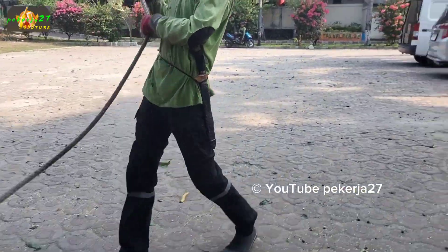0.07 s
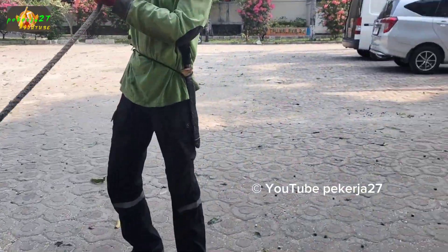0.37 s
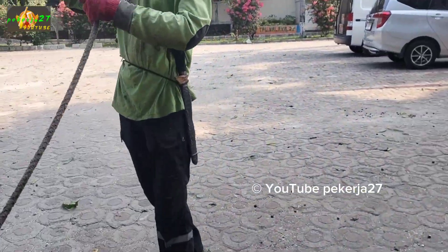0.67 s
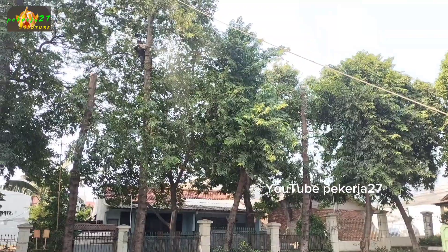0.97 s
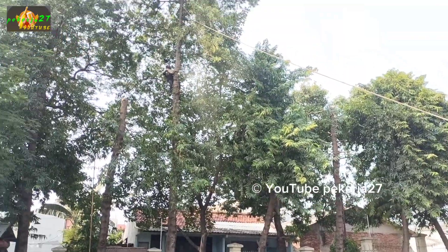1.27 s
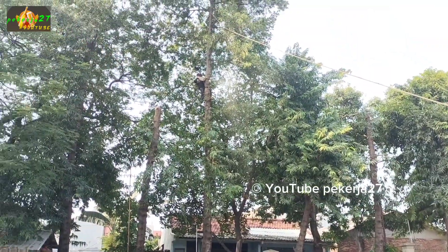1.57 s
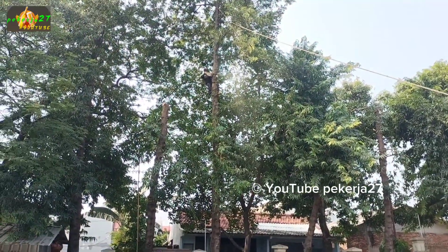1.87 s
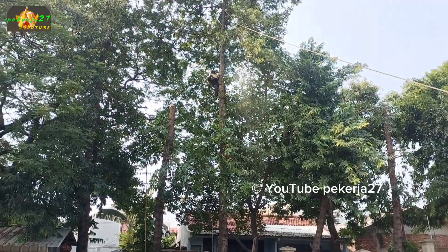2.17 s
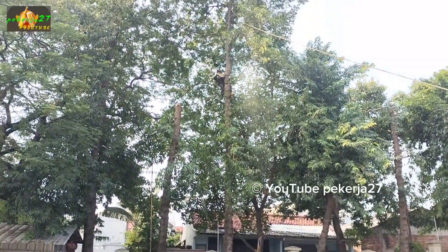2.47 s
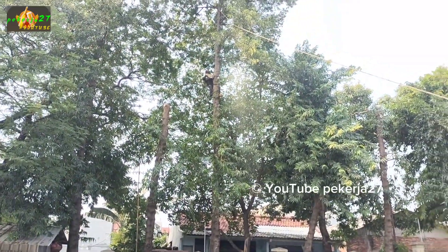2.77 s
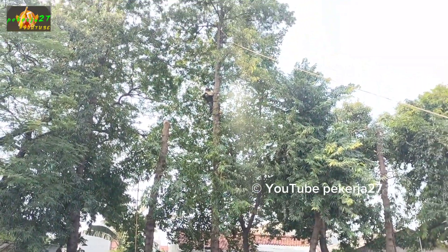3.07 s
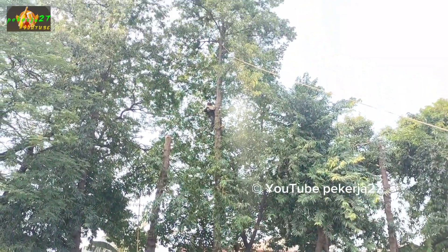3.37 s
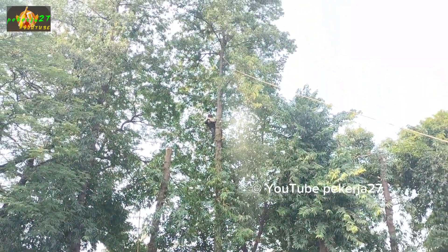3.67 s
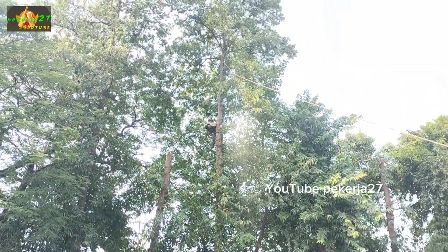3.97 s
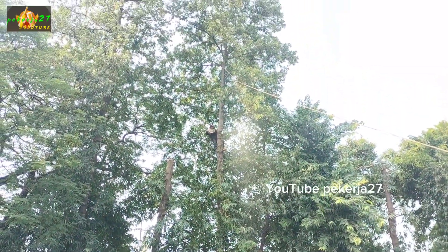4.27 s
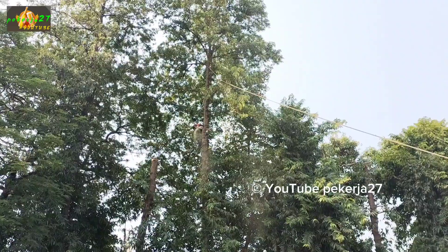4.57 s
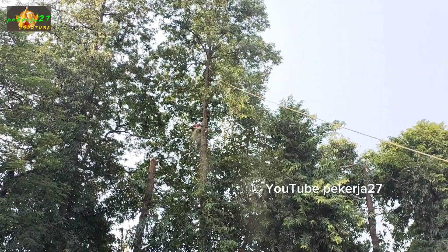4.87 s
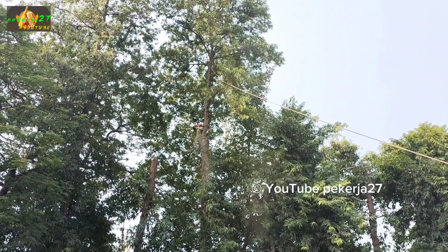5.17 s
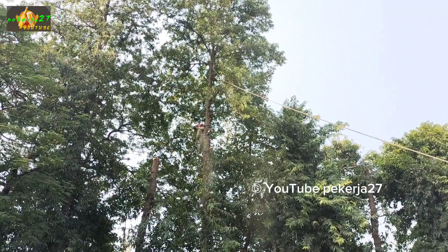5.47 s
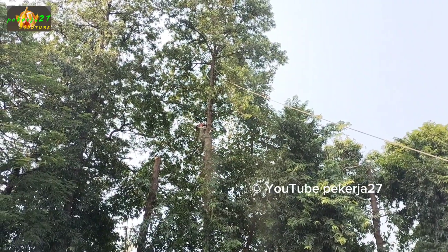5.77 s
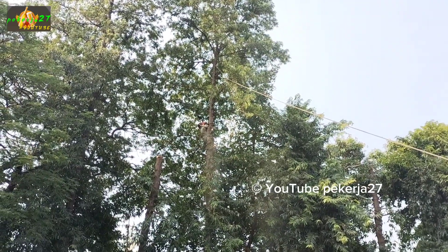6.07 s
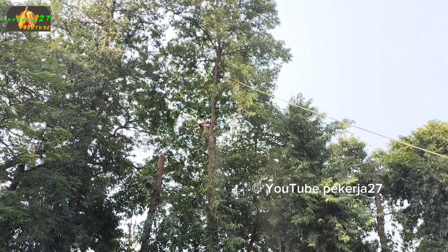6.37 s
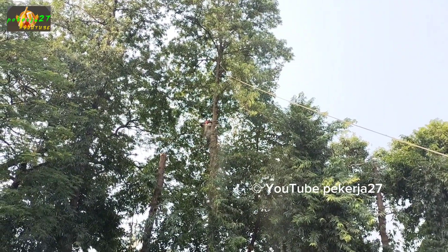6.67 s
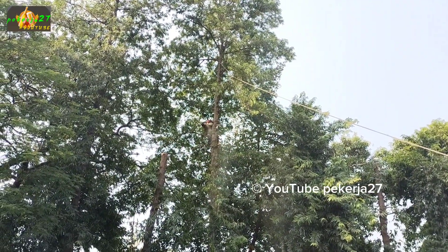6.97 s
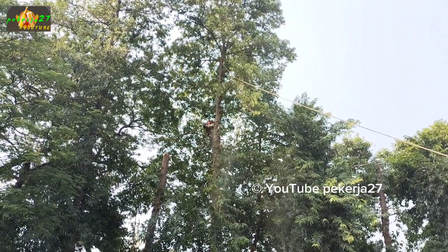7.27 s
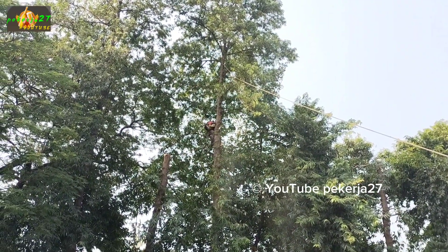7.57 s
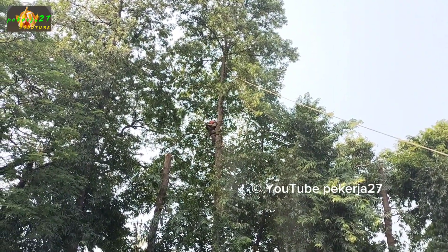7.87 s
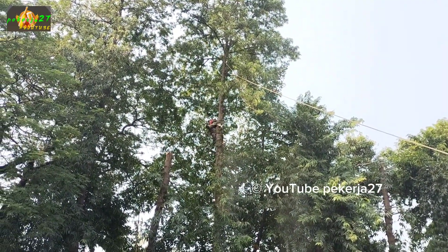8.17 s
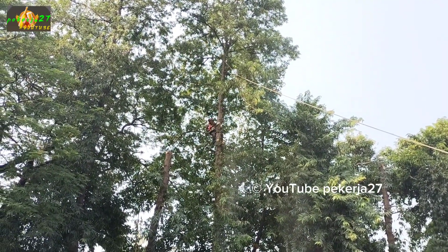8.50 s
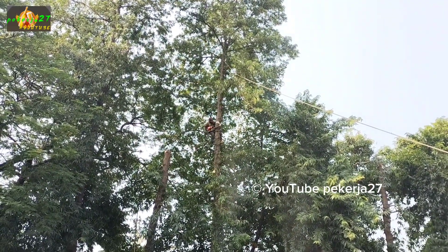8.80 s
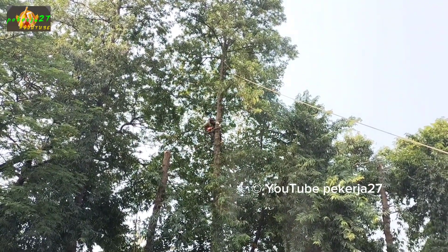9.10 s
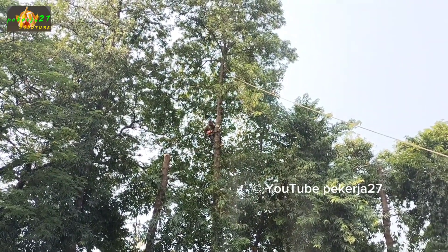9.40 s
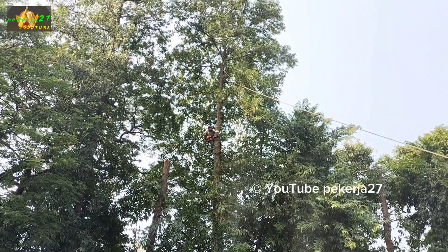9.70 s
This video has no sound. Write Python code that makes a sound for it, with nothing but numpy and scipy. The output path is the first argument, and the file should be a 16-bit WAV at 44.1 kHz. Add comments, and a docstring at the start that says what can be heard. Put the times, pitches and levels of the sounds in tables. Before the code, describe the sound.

It opens on quiet outdoor air with a faint hiss and a few soft scuffing steps, cutting to silence at about 0.8 seconds. At 1.3 seconds a two-stroke chainsaw up in a tree comes in abruptly, cutting wood at full throttle: a raspy, ringing buzz with a hissing chain and slightly wavering pitch. Near 3.9 seconds the throttle closes and the pitch falls, until a second silence from 4.4 to 5 seconds. The sound returns with a low puff of wind as the saw revs freely twice, briefly from 5 to 5.6 seconds, then longer and rougher from 5.7 to 6.7. It winds down and by about 7.5 seconds settles into a quieter, puttering idle, with irregular exhaust pops, casing rattle and small chain clinks until the end at 10 seconds. The stereo microphone hears it from the yard, over a soft low rumble.

```python
"""A quiet yard, with a low rumble and a few scuffs; then a two-stroke chainsaw high in a tree.
It cuts at full throttle, coasts, is blipped twice and sinks to a popping idle. Each crank turn
fires the exhaust, rings the muffler and shakes casing and clutch, while the chain hisses.
Over-revving without load, every other firing weakens. The stereo microphone hears the yard
in three stretches with silence between them."""
import sys
import numpy as np
from scipy import signal
from scipy.fft import rfft, irfft, next_fast_len
from scipy.io import wavfile
from scipy.ndimage import uniform_filter1d, map_coordinates

SR = 44100
rng = np.random.default_rng(int(sys.argv[2]) if len(sys.argv) > 2 else 0)


def wrap_up_sound(samples):
    """Save the sound to the file named by the first command line argument, as 16-bit audio."""
    columns = np.atleast_2d(samples).T
    # keep every value between -1 and 1, then stretch to whole-number steps
    tamed = np.clip(columns, -1, 1)
    steps = np.round(tamed * 32767).astype(np.int16)
    wavfile.write(sys.argv[1], SR, steps)


N = 433944
T = np.arange(N) / SR

# the stretches that are heard, with silence between them: (start [s], end [s])
STRETCHES = [(0, .824), (1.348, 4.444), (4.967, 10)]
# the exhaust's colour at idle: (frequency [Hz], gain [dB])
IDLE_SPECTRUM = [(60, -40), (130, -8), (250, -14), (400, 2), (520, -2.5), (690, 3.5), (830, -12.5),
                 (1200, -23), (2300, -5.5), (4000, -10), (6000, -34), (15000, -52)]
UNLOADED = T > STRETCHES[1][1]  # the chain is out of the wood


def amp(db):
    """Decibels to gain."""
    return 10 ** (np.asarray(db) / 20)


def unit(x):
    """Scale to rms 1."""
    return x / np.sqrt(np.mean(x ** 2) + 1e-20)


def steady(x):
    """Hold the short-term rms at 1."""
    return x / np.sqrt(np.abs(uniform_filter1d(x ** 2, size=4000)) + 1e-12)


def along(points, hz):
    """Read (frequency [Hz], value) points on a log axis."""
    f, v = np.transpose(points)
    return np.interp(np.log(hz + 1), np.log(f + 1), v)


def curve(points):
    """(time [s], value) points to one value per sample."""
    return np.interp(T, *np.transpose(points))


def wobble(rate, step=16):
    """A smooth random curve, rate knots a second."""
    at = np.arange(0, N + step, step)
    coarse = map_coordinates(rng.standard_normal(int(N * rate / SR) + 4), [at * rate / SR])
    return np.interp(np.arange(N), at, coarse)


def filtered(x, response):
    """x times a complex response of frequency."""
    size = next_fast_len(N + SR // 2)
    return irfft(rfft(x, size) * response(np.fft.rfftfreq(size, 1 / SR)), size)[..., :N]


def coloured(x, spectrum, size=4096):
    """Minimum-phase filter through (frequency [Hz], gain [dB]) points."""
    cepstrum = irfft(np.log(amp(along(spectrum, np.fft.rfftfreq(size, 1 / SR)))))
    cepstrum[1:size // 2] *= 2
    cepstrum[size // 2 + 1:] = 0
    impulse = irfft(np.exp(rfft(cepstrum)))
    return signal.oaconvolve(np.atleast_2d(x), impulse[None], axes=1)[:, :N]


def resonate(x, modes):
    """x through parallel resonances of alternating sign."""
    return filtered(x, lambda f: sum(
        (-1) ** k * amp(db) * 1j * f * width / (hz * hz - f * f + 1j * f * width)
        for k, (hz, width, db) in enumerate(modes)))


def reflected(x, decay_s=0.044):
    """x as mid, and its scattered near reflections as side."""
    t = T[:SR // 20]
    scatter = rng.standard_normal(len(t)) * amp(-60 * t / decay_s)
    phase = np.angle(rfft(scatter, 2 * len(t)))
    whitened = irfft(np.exp(1j * phase))[:len(t)]
    return np.array([x, signal.oaconvolve(x, whitened)[:N]])


def strokes(turns, strength, scatter_db, jitter_ms):
    """One pulse per turn, placed between samples, each a little different in size and timing."""
    count = np.arange(1, int(turns[-1]))
    late, loud = rng.standard_normal((2000, 2))[count].T
    at = np.interp(count, turns, np.arange(N))
    at = np.clip(at + late * jitter_ms[at.astype(int)] * SR / 1000, 8, N - 10)
    taps = at.astype(int)[:, None] + np.arange(-7, 9)
    offset = taps - at[:, None]
    size = strength[at.astype(int)] * amp(scatter_db * loud)
    shape = np.sinc(offset) * np.cos(np.pi * offset / 16) ** 2
    return np.bincount(taps.ravel(), (size[:, None] * shape).ravel(), N)


def puffs(turns, strength, fade=1.0, floor=1.0):
    """Mid and side noise that flares once a turn above a floor; fade is in turns."""
    flare = floor + strength * np.exp(-(turns % 1) / fade)
    return steady(rng.standard_normal((2, N)) * flare)


def level(speed, wood_db, free_db, doubling_db):
    """A part's gain at 160 turns a second, in the wood or free, and its change per doubling of speed."""
    return amp(np.where(UNLOADED, free_db, wood_db) + doubling_db * np.log2(speed / 160))


def yard():
    """Outdoor air with faint hiss and a few scuffs; later a rumble that a puff of wind lifts."""
    # the air in the first stretch, and after it: (frequency [Hz], gain [dB])
    quiet_spectrum = [(12, -20), (20, -14), (146, -4), (172, -13), (301, -23), (347, -22.5), (459, -25),
                      (660, -23), (759, -24), (825, -26), (1150, -25.5), (2750, -26.5), (4060, -31.5),
                      (13200, -37.5), (16000, -40.5)]
    rumble_spectrum = [(15, -31.5), (40, -6), (100, -0.5), (150, -4), (240, -5.5), (350, -10), (600, -24.5),
                       (2000, -67.5)]
    # scuffs and bumps: (time [s], width [s], thud [dB], grit [dB])
    scuff_events = [(0.075, 0.0058, -33.5, -38), (0.117, 0.0076, -29.5, -44), (.157, 0.004, -50, -44),
                    (0.303, 0.006, -36, -55), (0.353, 0.0091, -34, -60), (0.732, 0.003, -53, -39)]
    noise = lambda spectrum: unit(coloured(rng.standard_normal((2, N)), spectrum))
    swell = lambda at_s, width_s: np.exp(-((T - at_s) / width_s) ** 2 / 2)
    quiet = amp(-39.5) * noise(quiet_spectrum)
    gust_db = 7.4 * swell(at_s=5.05, width_s=0.68)
    rumble = amp(-39.0 + 1.3 * wobble(6) + gust_db) * noise(rumble_spectrum)
    thud = noise([(25, -10), (60, 6), (130, -4.0), (250, -10.0), (600, -27.5), (2000, -62)])
    grit = noise([(150, 1), (400, -9), (1100, 2), (1900, 5), (3500, -25), (15000, -24)])
    scuffs = sum(swell(s, width) * (amp(thud_db) * thud + amp(grit_db) * grit)
                 for s, width, thud_db, grit_db in scuff_events)
    return np.where(T < STRETCHES[1][0], quiet, rumble) + scuffs


def idle_putter(turns, idling):
    """Every idling turn puffs softly through the exhaust, some harder than others."""
    soft = strokes(turns, idling, scatter_db=2, jitter_ms=0.17 * idling)
    return amp(-46) * np.sqrt(np.mean(idling)) * unit(coloured(reflected(soft), IDLE_SPECTRUM))


def idle_pops():
    """At idle the mixture catches every third or fourth turn at best: a push and a short puff."""
    # the strongest firings: (time [s], relative level [dB])
    pop_events = [(7.587, -34.5), (7.674, -40), (7.739, -34), (7.804, -33), (7.889, -32), (7.97, -35),
                  (8.055, -33), (8.116, -34), (8.179, -37), (8.407, -30), (8.487, -29), (8.562, -32),
                  (8.643, -32), (8.877, -35), (8.937, -33), (9.06, -38), (9.143, -37), (9.205, -35),
                  (9.267, -31), (9.328, -32), (9.409, -34), (9.512, -36), (9.698, -30.5), (9.779, -28)]
    t = T[:SR // 30]
    pops = np.zeros(N + SR)
    for s, db in pop_events:
        gas = 0.043 * rng.standard_normal(len(t)) * np.exp(-t / 0.0052)
        gas[0] += 1
        pops[round(s * SR):][:len(t)] += amp(db) * gas
    return amp(33.5) * coloured(reflected(pops[:N]), IDLE_SPECTRUM)


def piston_pump(speed, turns, coasting):
    """With the throttle shut the piston still pumps air, unevenly."""
    # (multiple of the crank speed, relative level [dB])
    pump_orders = [(2, -47.5), (3, -45.5), (4, -46), (5, -45.5), (6, -54.5), (8, -63.5)]
    air = sum(amp(db + 2.6 * wobble(20)) * np.sin(2 * np.pi * k * turns + wobble(20))
              for k, db in pump_orders)
    return level(speed, wood_db=-2.5, free_db=-4, doubling_db=-2.5) * coasting * air


def casing_and_clutch(speed, turns, coasting):
    """The shaking casing rattles, most of all off the throttle, and the loose clutch drum rings."""
    # modes of the casing with the bar, and of the drum: (frequency [Hz], width [Hz], gain [dB])
    casing_modes = [(670, 52, -4), (920, 28, -1), (1171, 14, -1), (1373, 23, -8), (2345, 150, 2.5)]
    drum_modes = [(2847, 33, -6.5), (3170, 28, 1), (3380, 78, -5.5), (3548, 24, 5), (3780, 200, -4.5),
                  (4272, 50, 1), (4560, 70, -5.5), (5770, 110, -11)]
    # the slack chain clinks at idle: (time [s], strength over the usual shaking)
    chain_clinks = [(8.407, 1.6), (8.488, 1.8), (8.644, 3), (9.268, 2.5), (9.70, 2.2), (9.779, 2.4)]
    shakes = puffs(turns, amp(2.4 * wobble(45)), fade=0.49, floor=0.45)
    shakes *= 1 + sum(size * (T > s) * np.exp(-np.abs(T - s) / 0.0039) for s, size in chain_clinks)
    casing = (0.57 + 0.5 * coasting) * steady(resonate(shakes, casing_modes))
    slack_db = 3.5 * (T > chain_clinks[0][0])
    drum = amp(slack_db) * steady(resonate(shakes, drum_modes))
    return level(speed, -33, -31.5, 9) * casing + level(speed, -36.5, -32, 7) * drum


def chain_hiss(speed, turns, charge, racing, idling):
    """The racing chain hisses, brightest in the wood; at idle only a duller clatter is left."""
    # (frequency [Hz], gain [dB])
    hiss_spectrum = [(2650, -28.5), (4500, -2), (5140, -8), (5650, -10.5), (6120, -7), (8200, -11.5),
                     (10400, -9.5), (14000, -15), (15100, -13), (16000, -54)]
    clatter_spectrum = [(3000, -28), (4500, -8), (5200, -19.5), (5750, -11.5), (6600, -15), (8800, -24.5),
                        (9700, -21), (10000, -14.5), (10400, -22.5), (11700, -18.5), (13400, -30),
                        (14400, -48), (15500, -28)]
    links = puffs(turns, charge) * amp(0.85 * wobble(300))
    bright = racing * (1 - 0.14 * UNLOADED)
    hiss = bright * unit(coloured(links, hiss_spectrum))
    clatter = (1 - bright) * unit(coloured(links, clatter_spectrum))
    return level(speed, -32.5, -36.5, 9.5) * amp(0.5 * idling) * steady(hiss + clatter)


def engine_rasp(speed, turns, charge):
    """A broad rasp that flares with each turn."""
    # (frequency [Hz], gain [dB])
    rasp_spectrum = [(200, -14), (400, -26), (540, -6.5), (700, 2.5), (1050, -3), (1500, 0), (2000, 2),
                     (2330, 2.5), (2700, 2), (3050, -7), (3600, 2.5), (4400, 0), (5100, -8), (7000, -35.5)]
    return level(speed, -31, -30.5, 7.5) * steady(coloured(puffs(turns, charge), rasp_spectrum))


def engine_drone(speed, turns, throttle, racing, misfire):
    """The two lowest orders are nearly pure; weak firings add a line halfway between them."""
    # the first order swells and fades in the cut and in the blips: (time [s], level [dB])
    first_cut = [(1.36, -31), (1.46, -26.5), (1.71, -37), (1.83, -22.5), (2.74, -23.5), (2.81, -42.5),
                 (2.85, -26.5), (3.14, -26.5), (3.28, -41), (3.56, -24.5), (3.65, -40), (3.72, -29.5),
                 (3.87, -32)]
    first_blips = [(5.12, -41), (5.146, -45), (5.19, -30), (5.488, -21), (5.662, -40), (6.1, -21.5),
                   (6.696, -28.5), (6.72, -32)]
    # the rising second order passes a resonance, then a notch: (frequency [Hz], gain [dB])
    second_response = [(200, -19.5), (250, -18), (296, -15), (320, -16.5), (330, -18.5), (338, -25)]
    # it grows slowly in the cut: (time [s], gain [dB])
    second_cut = [(1.36, -4), (1.65, -3), (1.85, -5), (2.2, 1), (2.65, -1), (3.0, 0.5), (3.3, 0),
                  (3.75, -0.5)]
    first = throttle * amp(curve(np.vstack([first_cut, first_blips])))
    growth_db = np.where(UNLOADED, -1.8, curve(second_cut))
    throttle_db = -8.5 * (1.5 - throttle)
    second = racing * amp(along(second_response, 2 * speed) + growth_db + throttle_db)
    angle = 2 * np.pi * turns
    halfway = 1.07 * misfire * np.sin(1.5 * angle)
    return first * (halfway - np.cos(angle)) - second * np.sin(2 * angle)


def trunk_echo(firings):
    """The trunk echoes each firing; as the saw moves, single partials swell and fade."""
    delay_s = 0.002432 + 0.00008 * wobble(3)
    return firings + 0.54 * map_coordinates(firings, [np.arange(N) - delay_s * SR])


def muffler_ring(firings, speed, turns, charge, misfire):
    """Each blowdown and its turbulent gas ring the muffler can."""
    # (frequency [Hz], width [Hz], gain [dB])
    can_modes = [(3055, 36, -6.5), (3348, 65, 0.5), (3558, 100, 4), (3735, 117, 2), (4000, 64, -3.5)]
    # the ring swells and fades about its mean in the cut: (time [s], relative level [dB])
    ring_cut = [(1.36, -22.5), (1.79, -29.5), (1.95, -23), (3.09, -26), (3.34, -24), (3.8, -26.5)]
    gas = (0.28 + 0.5 * misfire) * puffs(turns, charge, fade=0.68, floor=0.41)
    ring = steady(resonate(steady(firings) + gas, can_modes))
    swell_db = np.where(UNLOADED, 0, curve(ring_cut) - np.mean(ring_cut, axis=0)[1])
    return level(speed, -24.5, -25, 5.5) * amp(swell_db) * ring


def exhaust(firings, speed):
    """The firings honk in the exhaust's lower resonance, and bark and buzz above it."""
    # (frequency [Hz], gain [dB])
    honk_spectrum = [(400, -49.5), (540, -5.5), (620, -1.5), (720, 4), (800, -5), (900, -18.5), (1200, -43)]
    bark_spectrum = [(300, -45), (400, 3), (480, 1.5), (560, -0.5), (760, -19), (860, 5), (940, 9.5),
                     (1080, 2), (1240, -6), (1400, -16.5), (1800, -38.5)]
    buzz_spectrum = [(1000, -34), (1400, -8.5), (1700, 3.5), (2000, -2), (2200, -1), (2370, 13.5),
                     (2550, -10.5), (2850, 3.5), (3100, -5), (4200, -6), (4700, -4.5), (6000, -11),
                     (9000, -37.5)]
    honk = level(speed, -34.5, -33.5, 3) * unit(coloured(firings, honk_spectrum))
    bark = level(speed, -31.5, -32, 0) * unit(coloured(firings, bark_spectrum))
    buzz = level(speed, -34.5, -43.5, 2.5) * unit(coloured(firings, buzz_spectrum))
    return honk + bark + buzz


def misfiring(ramp_s=0.045):
    """How much every second firing weakens, 0-1, as the engine over-revs without load."""
    # (start [s], end [s], weakening [0-1])
    misfire_spans = [(5.436, 5.628, 0.2), (6.184, 6.74, 0.51)]
    return sum(depth * np.clip(np.minimum(T - start, end - T) / ramp_s, 0, 1)
               for start, end, depth in misfire_spans)


def trigger(open_s=0.11, close_s=0.044):
    """Throttle opening 0-1: each pull ramps up, holds and dies away."""
    # the cut and two blips: (opens [s], closes [s], depth [0-1])
    trigger_pulls = [(1.104, 3.848, 1), (5.008, 5.553, 0.99), (5.704, 6.689, 0.94)]
    opening = np.zeros(N)
    for opens, closes, depth in trigger_pulls:
        rise = np.clip((T - opens) / open_s, 0, 1)
        opening += depth * rise * np.exp(-np.maximum(T - closes, 0) / close_s)
    return np.clip(opening, 0, 1)


def crank_speed(coast_s=0.37, sink_hz=30.21, idle_hz=48.37):
    """Turns per second: after each run, friction slows the crank until the idle catches it."""
    # the cut, the start of a coast, and a list for each blip: (time [s], speed [turns/s])
    cut_run = [(1.36, 159.3), (1.51, 158.6), (1.58, 156.5), (1.7, 156.5), (1.79, 160.6), (1.9, 167.7),
               (1.98, 168.9), (2.41, 159.2), (2.48, 160.3), (2.6, 164.7), (2.7, 161.6), (2.82, 153.0),
               (2.99, 154.7), (3.23, 147.7), (3.36, 146.9), (3.56, 156.5), (3.83, 154.9), (3.88, 152.2)]
    coast_run = [(4.96, 123)]
    blip_runs = [
        [(5.05, 98.7), (5.088, 108.0), (5.198, 136.6), (5.222, 140.5), (5.368, 158.5), (5.414, 162.9),
         (5.552, 171.6), (5.57, 166.9)],
        [(5.76, 114.2), (5.842, 134.8), (5.9, 147.0), (5.98, 158.6), (6.19, 169.7), (6.44, 170.4),
         (6.626, 151.1), (6.72, 146.1)],
    ]
    speed = np.full(N, float(cut_run[0][1]))
    for run in [cut_run, coast_run, *blip_runs]:
        momentum = np.exp(-np.maximum(T - run[-1][0], 0) / coast_s)
        speed = np.where(T >= run[0][0], sink_hz + (curve(run) - sink_hz) * momentum, speed)
    return np.maximum(speed, idle_hz * (1 + 0.015 * wobble(3)))


def chainsaw():
    """The saw up in the tree, as mid and side: one crank drives exhaust, muffler and mechanics."""
    speed, throttle, misfire = crank_speed(), trigger(), misfiring()
    coasting = np.sqrt(1 - throttle ** 2)
    racing = np.clip((speed - 55) / 80, 0, 1)
    idling = np.clip((62 - speed) / 12, 0, 1)
    turns = np.cumsum(speed * (1 + 0.0006 * wobble(30))) / SR
    # combustion is even in the cut and ragged when the chain runs free
    ragged = amp((0.45 + 1.2 * UNLOADED) * wobble(90))
    odd_turn = np.floor(turns + 1 / 4) % 2
    charge = ragged * (1 - misfire * odd_turn)
    drone = ragged * engine_drone(speed, turns, throttle, racing, misfire)
    pump = piston_pump(speed, turns, coasting)
    firings = strokes(turns, charge, scatter_db=1.04, jitter_ms=0.0026 + 0.038 * misfire)
    firings = reflected(trunk_echo(firings))
    roar = exhaust(firings, speed) + muffler_ring(firings, speed, turns, charge, misfire)
    rasp = engine_rasp(speed, turns, charge)
    rattle = casing_and_clutch(speed, turns, coasting)
    hiss = chain_hiss(speed, turns, charge, racing, idling)
    putter = idle_putter(turns, idling)
    low_tones = np.sqrt(2) * reflected(drone + pump)  # sine levels from rms to peak
    return low_tones + throttle * roar + rasp + rattle + hiss + putter


def microphone_pair(mid, side):
    """Mid and side to left and right: the channels differ more in the treble."""
    # (frequency [Hz], likeness of the channels [0-1])
    channel_likeness = [(60, .985), (150, .995), (320, .992), (500, .92), (1000, .84), (2000, .66),
                        (3500, .58), (5000, .42), (12000, .25)]
    # (frequency [Hz], left minus right [dB])
    channel_lean = [(150, 0.5), (320, 0.3), (1000, -1.5), (2200, 0.5), (3300, -10), (4800, 2), (9000, -1.5),
                    (15000, -3.5)]
    side = filtered(side, lambda f: np.tan(np.arccos(along(channel_likeness, f)) / 2))
    pair = np.array([mid + side, mid - side])
    return filtered(pair, lambda f: amp(np.outer([0.5, -0.5], along(channel_lean, f))))


def scene():
    """The yard alone at first; the saw is heard from the second stretch on."""
    running = T > STRETCHES[0][1] + 0.1
    return microphone_pair(*(running * chainsaw() + idle_pops() + yard()))


def record(dry, top_hz=15900):
    """Silence falls abruptly between the stretches, and in each the microphone is aimed a little differently;
    the top treble is cut off."""
    # for each stretch: (lag of the left channel [samples])
    left_lags = [-14, 2, -2]
    left, right = dry
    heard = sum(((T >= start) & (T < end)) * np.array([np.roll(left, lag), right])
                for (start, end), lag in zip(STRETCHES, left_lags))
    return filtered(heard, lambda hz: np.clip((top_hz - hz) / 100, 0, 1))


dry = scene()
out = record(dry)
wrap_up_sound(out)
```